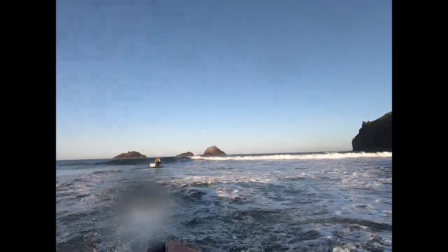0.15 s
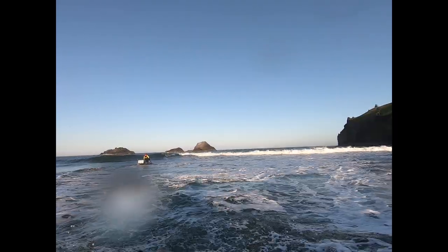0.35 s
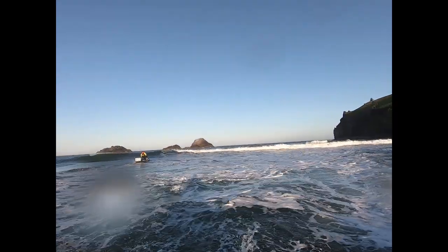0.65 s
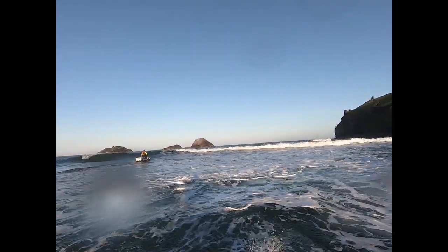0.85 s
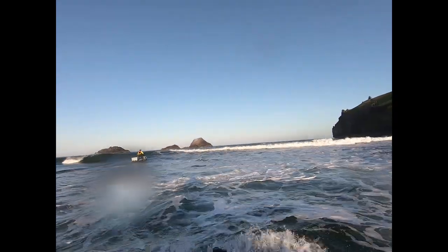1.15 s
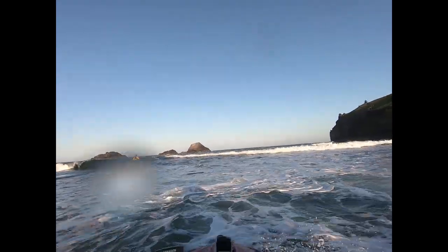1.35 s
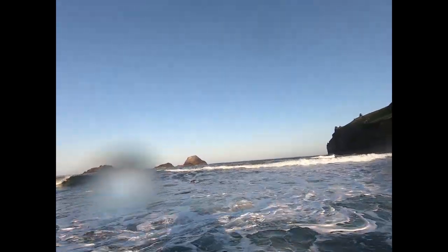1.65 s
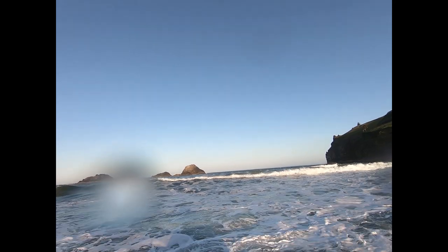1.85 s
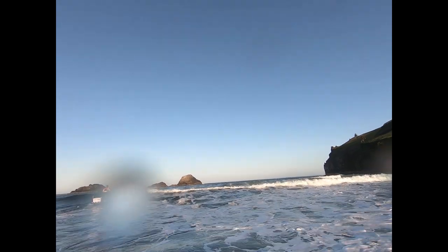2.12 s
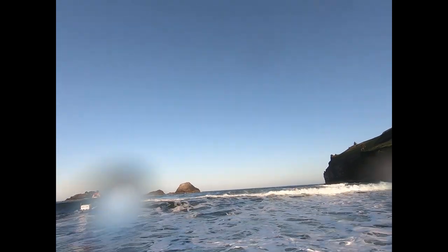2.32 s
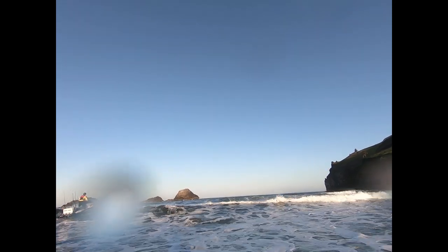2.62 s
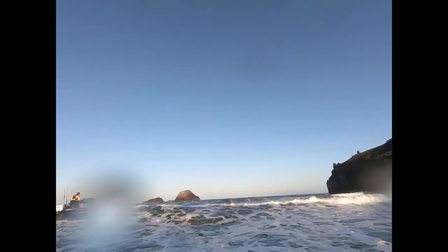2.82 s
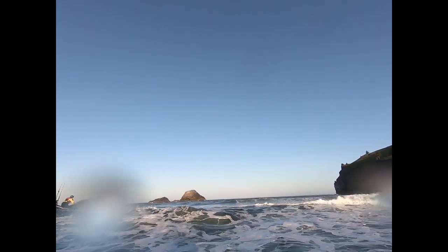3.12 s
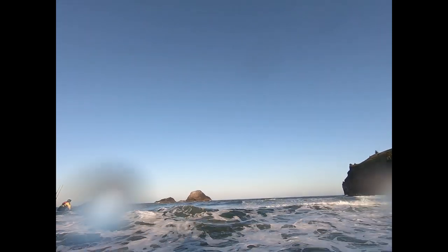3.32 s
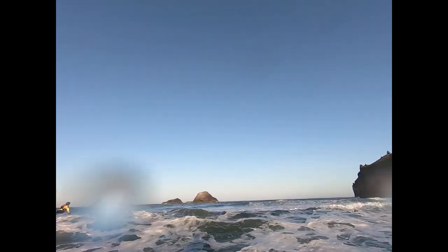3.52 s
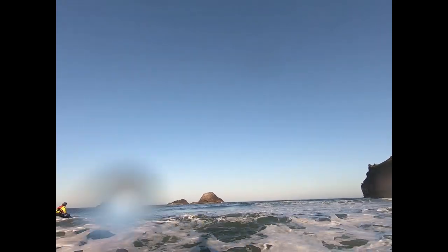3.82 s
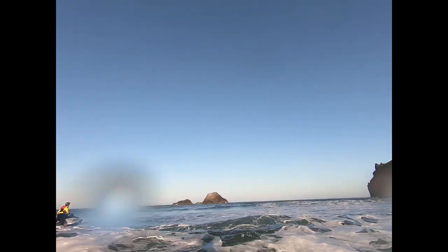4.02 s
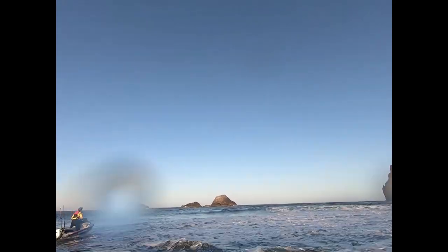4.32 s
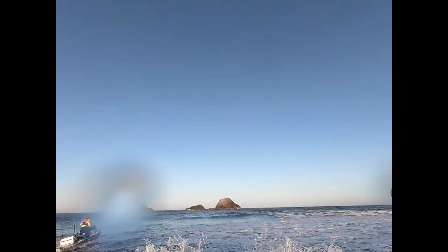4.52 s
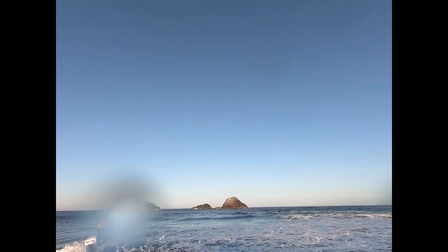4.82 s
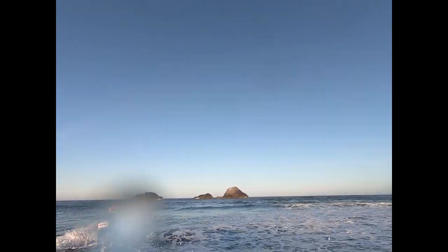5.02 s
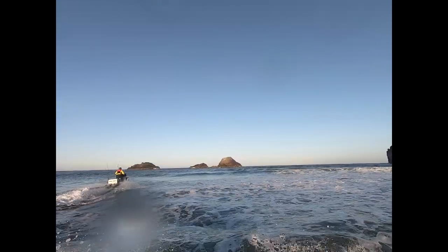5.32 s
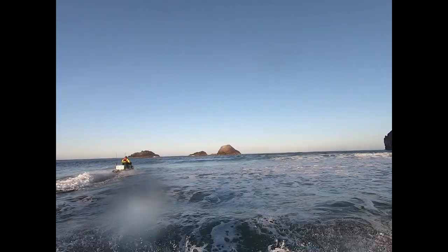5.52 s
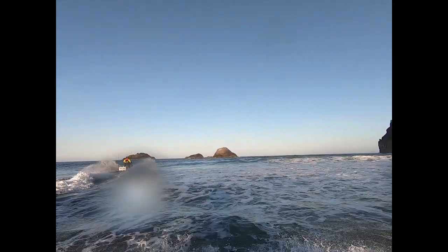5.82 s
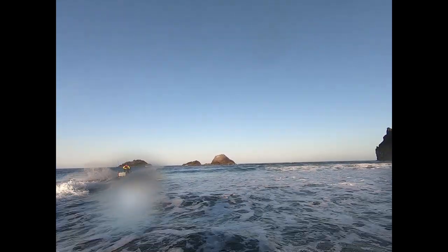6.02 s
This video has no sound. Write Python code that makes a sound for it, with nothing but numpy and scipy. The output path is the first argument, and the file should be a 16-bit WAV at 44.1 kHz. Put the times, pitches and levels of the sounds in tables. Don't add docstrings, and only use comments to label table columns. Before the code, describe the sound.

From a camera mounted on a small jet watercraft in open surf, a buzzing engine hums through the hull, racing over crests and sagging between them. Water rushes, slaps and hisses constantly, chop drums on hollow panels, and low wind buffets the microphone. The wide sound narrows to mono after two seconds; the engine bogs down near the end, then revs hard again.

```python
import sys
import numpy as np
from scipy import signal
from scipy.fft import next_fast_len
from scipy.io import wavfile
from scipy.ndimage import uniform_filter1d, minimum_filter1d

SR = 44100
rng = np.random.default_rng(int(sys.argv[2]) if len(sys.argv) > 2 else 0)


def attenuation_scalar(level_db):
    decades = np.asarray(level_db, float) / 20
    return 10 ** decades


def to_wav(s):
    ch = np.atleast_2d(s).T
    pcm = np.round(np.clip(ch, -1, 1) * 32767)
    wavfile.write(sys.argv[1], SR, pcm.astype(np.int16))


N = 271215
TIME = np.arange(N) / SR
HOP, SIZE = 256, 1024
HZ = np.fft.rfftfreq(SIZE, 1 / SR)
FRAME_S = np.arange(N // HOP + 5) * HOP / SR
MIST_FROM = 4.3

# (frequency [Hz], likeness [0-1])
PORT_LIKENESS = [(60, .6), (170, .95), (400, .75), (690, .25), (1100, .7), (2100, .6), (2600, .35),
                 (3800, .75), (5300, .25), (15000, .2)]
# (frequency [Hz], level difference [dB])
PORT_LEAN = [(60, -2.5), (150, -3.5), (450, -7), (800, -7), (1400, -3), (2800, -.5), (6000, -6.5),
             (7000, -1), (8600, 1), (15000, -1)]
# (frequency [Hz], phase [rad])
PORT_LEAD = [(60, 0), (560, 0), (860, 2), (2070, 1.3), (2600, .8), (3800, .8), (5200, -.2), (8600, -2.3),
             (15000, -2.3)]
# (time [s], stereo share [0-1])
STEREO_SHARE = [(0, 1), (1.95, 1), (2.4, 0.31), (2.8, 0.14), (3.2, 0.017), (3.4, 0.0033), (6.15, .003)]
# (middle [s], length [s], level [dB])
HULL_SURGES = [(0.24, 0.18, 3.5), (0.854, 0.49, 5), (1.34, 0.42, 2), (1.9, 0.19, 7.5), (2.27, 0.58, -4),
               (3, 0.11, 1), (3.27, 0.99, -6), (3.74, 0.89, -5.5), (4.3, 0.29, 0.5), (4.61, 1, 6),
               (5.9, 0.34, 2), (4.9, 0.22, 3.5), (3.1, .2, -1.5), (2.7, 0.65, -2.5), (4.78, 0.15, -0.5),
               (5.48, 0.77, 2.5), (5, 0.21, 1), (6.14, 0.66, 4), (4.07, 0.62, 2.5), (1.3, 0.12, 0.5),
               (4.87, 0.13, -3.5), (4.96, .12, -3), (2.97, .2, -2), (4.1, .1, -1), (4.12, 0.16, -2),
               (2.06, .15, 2), (5.2, .25, 2), (5.65, .15, -1.5)]


def evened(x):
    return x / np.sqrt(np.mean(abs(x) ** 2) + 1e-20)


def read(points, hz):
    f, value = np.transpose(points)
    return np.interp(np.log(hz + 1), np.log(f + 1), value)


def columns(table, t):
    s, *rest = np.transpose(table)
    return [np.interp(t, s, c) for c in rest]


def stereo_share(t):
    return columns(STEREO_SHARE, t)[0]


def swells(table, t):
    return sum(top * np.cos(np.pi * np.clip((t - s) / length, -.5, .5)) ** 2 for s, length, top in table)


def bump(shape, amount):
    hz, width, db = shape
    return np.outer(db * np.exp(-.5 * ((HZ - hz) / width) ** 2), amount)


def drift(hz):
    chance = uniform_filter1d(rng.standard_normal(N), size=200)
    return evened(signal.lfilter([1], [1, -np.exp(-2 * np.pi * hz / SR)], chance))


def add(mix, s, sound):
    part = mix[round(s * SR):][:len(sound)]
    part += sound[:len(part)]


def ports(x, lean_db, lead):
    turn = np.exp(.5j * lead * np.array([[1], [-1]]))
    padded = np.pad(x, SIZE, "reflect", reflect_type="odd")
    whole = signal.hilbert(padded, next_fast_len(N + 2 * SIZE))
    return (whole[SIZE:SIZE + N] * turn).real * attenuation_scalar(np.array([[.5], [-.5]]) * lean_db)


def noise(field_db, same, lead, lean_db, patchy_db, flicker_db):
    a, b, c, d, patches = rng.standard_normal((len(FRAME_S), len(HZ), 5)).T
    flicker = evened(uniform_filter1d(uniform_filter1d(patches, size=120, axis=0), size=2, axis=1))
    patches = evened(uniform_filter1d(uniform_filter1d(patches, size=10, axis=0), size=12, axis=1))
    same, lead = np.clip(same, -1, 1)[:, None], lead[:, None]
    left = a + 1j * b
    right = same * left * np.exp(-1j * lead) + np.sqrt(1 - same ** 2) * (c + 1j * d)
    z = np.array([left, right])
    z *= attenuation_scalar(np.multiply.outer([.5, -.5], lean_db))[:, :, None]
    z /= np.sqrt((1 + same * np.cos(lead)) / 2)
    z *= attenuation_scalar(field_db + patchy_db * patches + flicker_db * flicker)
    return signal.istft(z, nperseg=SIZE, noverlap=SIZE - HOP)[1][:, :N] / np.sqrt(SIZE)


def unit_band(shape_db, lo_hz, hi_hz):
    inside = (HZ > lo_hz) & (HZ < hi_hz)
    return shape_db - 10 * np.log10(np.sum(attenuation_scalar(shape_db[inside]) ** 2, axis=0) / len(HZ))


def speed(t):
    # (time [s], firing rate [Hz])
    throttle = [(0, 109.3), (.71, 110.5), (1.02, 175.6), (1.61, 149.5), (1.8, 148.1), (2.09, 118.9),
                (3.03, 126.1), (3.22, 112.8), (3.42, 87.3), (3.62, 79.36), (3.9, 78.84), (4.12, 97.32),
                (4.42, 98.9), (4.65, 54.8), (4.85, 43.63), (5.04, 109.5), (5.24, 155), (6.15, 136)]
    # (middle [s], length [s], rise [Hz])
    leaps = [(.39, .5, 30), (1.22, 0.52, 20), (2.56, 0.21, 3), (2.62, 0.48, 8), (4.555, .26, 9.5),
             (5.255, 0.31, 22), (.18, 0.15, -4), (.32, .14, 5), (.53, 0.141, 5), (.64, .1, -3),
             (5.8, 0.7, 19.5), (5.69, 0.11, 5.5), (5.77, 0.11, -2.5), (3.96, .12, -3), (4.07, .12, 2),
             (5.26, .14, -5), (4.64, .1, 3), (2.59, .12, 2), (4.75, .1, -3)]
    inertia_s = .04
    before, after = columns(throttle, t - inertia_s / 2)[0], columns(throttle, t + inertia_s / 2)[0]
    return (before + after) / 2 + swells(leaps, t)


def level(rule, t):
    # (time [s], level [dB])
    thrown = [(0, 9.5), (.31, 7.5), (.6, 3), (1.04, 3.5), (1.6, 3), (1.88, 1), (2.02, -7), (2.48, -6.5),
              (3.07, -2), (3.4, -1), (3.94, 5), (4.33, 1.5), (4.64, -7.5), (4.8, -6), (5.05, 4), (5.33, 6),
              (5.53, 0), (6.15, -6.5)]
    # (middle [s], length [s], level [dB])
    bow_waves = [(.6, 0.082, 1.5), (.76, 0.24, 0), (1.2, 0.72, 2.5), (1.72, 0.17, 2.5), (2.24, 0.85, 5.5),
                 (3.42, 0.6, 2.5), (4.75, 0.43, -1.5), (5.8, .6, 3), (6.1, 0.49, 1), (.1, 0.53, -1.5),
                 (1.13, 0.081, 1.5), (4.35, 0.42, 1.5)]
    db, share, octave_db, open_db = rule
    throw = columns(thrown, t)[0] + swells(bow_waves, t)
    return db + share * throw + octave_db * np.log2(speed(t) / 120) + open_db * stereo_share(t)


def wind():
    # (frequency [Hz], density [dB per Hz])
    wind_colour = [(12, -4.5), (25, 8.5), (45, 10), (80, 16), (150, -5.5), (300, -16.5), (600, -79.5),
                   (2000, -130)]
    # (middle [s], length [s], level [dB])
    buffets = [(.68, 0.66, 6.5), (1.05, 1, 17.5), (1.27, 0.13, 8), (1.455, 0.31, 14), (1.73, 0.094, 13.5),
               (1.9, 0.67, 19.5), (2.81, 0.1, 10), (3.1, 0.81, 6.5), (3.82, 0.18, 9), (3.55, .3, -16),
               (4.15, 1, -23.5), (.25, .3, -1), (1.6, 0.17, 12.5), (2.1, 0.21, 5), (3.4, .2, 9.5),
               (4.57, .1, 1.5), (4.72, 0.55, 18.5), (.6, 0.11, 10), (5.35, .1, 8.5), (5.76, .1, 10),
               (3.75, .4, 7.5), (5.3, 0.13, -2), (5.55, 0.31, 16), (5.82, .25, -7), (5.28, .1, 5),
               (4.75, .15, 3), (4.15, .3, -5.5), (.42, .12, -5.5), (1.0, 0.11, 3.5), (.62, .15, 3)]
    calm_db = -40.5
    field = unit_band(read(wind_colour, HZ)[:, None], 10, 100) + calm_db + swells(buffets, FRAME_S) + 5.0
    slap_s, spread_s, slap_db, top_hz = 1.925, .028, -23, 700
    puff = signal.sosfilt(signal.butter(3, top_hz, fs=SR, output="sos"), rng.standard_normal(N))
    slap = attenuation_scalar(slap_db) * evened(puff) * np.exp(-.5 * ((TIME - slap_s) / spread_s) ** 2)
    buffeting = noise(field, .35 + 0 * HZ, 0 * HZ, -2.5 + 0 * HZ, patchy_db=1.2, flicker_db=.8)
    return buffeting + slap * np.array([[1], [-.9]])


def water():
    # (frequency [Hz], density [dB per Hz])
    open_colour = [(350, -17.5), (600, -2.5), (642, -20.5), (798, -12), (1080, -6.5), (1340, -12),
                   (1450, -10), (2500, -17.5), (3110, -18.5), (4680, -29), (6230, -22.5), (8290, -37),
                   (11000, -48), (12600, -49.5), (15500, -69)]
    # (frequency [Hz], density [dB per Hz])
    sheltered_colour = [(350, -16), (600, -13.5), (900, -6), (1290, -10), (1830, -13), (2570, -23),
                        (3500, -21), (5430, -18.5), (6940, -31.5), (9240, -39.5), (11200, -51.5),
                        (11900, -40), (12600, -35), (15600, -45.5)]
    # (middle [s], length [s], frequency [Hz], width [Hz], level [dB])
    cancel = [
        (2.42, .5, 3350, 220, -6.5),
        (2.55, .7, 2900, 300, -3.5),
        (2.85, .6, 2800, 250, -4),
        (2.2, .5, 2800, 400, -2.5),
    ]
    # (middle [s], length [s], level [dB])
    douses = [
        (.15, 0.45, 3),
        (0.78, .1, 0),
        (0.91, .2, -3),
        (1.1, .12, -1.5),
        (4.3, .2, 1.5),
    ]
    # (middle [s], length [s], level [dB])
    hisses = [
        (.62, 0.055, 3),
        (.75, 0.18, 4),
        (1.14, 0.11, 1),
        (.95, 0.24, 0.5),
        (1.75, 0.41, -1),
        (2.76, .05, 2),
        (.4, .12, -2),
        (1.2, .06, 2),
        (5.75, .3, 0),
        (6.05, 0.39, -5.5),
    ]
    # (middle [s], length [s], level [dB])
    flecks = [
        (1.92, .1, 7),
        (2.81, .35, 10.5),
        (3.4, .9, 3),
        (2.55, .5, 9.5),
        (.62, .1, 5),
        (4.1, 0.27, 6.5),
        (4.65, .3, 2.5),
        (4.9, .15, 3),
        (5.2, 0.52, -6.5),
    ]
    share = np.clip(stereo_share(FRAME_S), 0, 1)
    shapes = bump((910, 210, 5.3), np.clip((speed(FRAME_S) - 150) / 22, 0, 1))
    for middle, length, *notch in cancel:
        shapes = shapes + bump(notch, swells([(middle, length, 1)], FRAME_S))
    top_share = np.clip((MIST_FROM - FRAME_S) / .2, 0, 1)
    share = np.where(HZ[:, None] > 9500, top_share, share)
    colour = read(open_colour, HZ)[:, None] * share + read(sheltered_colour, HZ)[:, None] * (1 - share)

    wash = level((-37, 0.6747, 0.5, -1.85), FRAME_S) + 0.35 * swells(HULL_SURGES, FRAME_S)
    splash = level((-49, 0.88, -0.9, 4.5), FRAME_S) + swells(douses, FRAME_S)
    spray = level((-49.5, 1.0, -0.5, 2), FRAME_S) + swells(hisses, FRAME_S)
    mist = level((-95, 1.7, -1.9, 14), FRAME_S) + swells(flecks, FRAME_S)
    mist = mist + 28 * np.clip((FRAME_S - 4.3) / .25 + .5, 0, 1)

    bands = [(700, 2000), (2200, 4000), (4500, 9000), (11800, 15500)]  # Hz, wash to mist
    lift = np.array([db + (unit_band(colour, *band) - colour)[0]
                     for band, db in zip(bands, (wash, splash, spray, mist))])
    corners_hz = [1600, 2600, 3400, 4200, 10500, 11600]
    place = np.interp(np.log(HZ + 1), np.log(corners_hz), [0, 1, 1, 2, 2, 3])
    weight = np.maximum(1 - abs(place[:, None] - np.arange(4)), 0)
    field = colour + weight @ lift + shapes + 2.7 * weight[:, 3:]
    return noise(field, read(PORT_LIKENESS, HZ), read(PORT_LEAD, HZ), read(PORT_LEAN, HZ),
                 patchy_db=0.32, flicker_db=.6)


def drops():
    # (time [s], level [dB], frequency [Hz])
    stray_drops = [
        (2.764, -31, 690),
        (4.812, -26.5, 533),
    ]
    t, out = np.arange(1200) / SR, np.zeros(N)
    for s, db, hz in stray_drops:
        add(out, s, attenuation_scalar(db - 60 * t / 0.028) * np.sin(2 * np.pi * hz * t))
    return out


def hull():
    # (frequency [Hz], density [dB per Hz])
    roar_colour = [(40, -22), (70, 0.5), (120, 3), (250, 2.5), (400, -3.5), (600, -12), (900, -19),
                   (1500, -50.5), (4000, -120)]
    # (middle [s], length [s], level [dB])
    drumming = [
        (.38, .3, 4),
        (1.6, 0.89, 17.5),
        (2.5, 0.86, 3),
        (3.3, .5, 3),
        (4.2, 0.47, -5),
        (4.62, .2, 1),
        (5.5, .3, 8),
    ]
    # (time
    # [s], start [Hz], end [Hz], length [s], level [dB])
    gulps = [(.22, 505, 507, 0.12, -28), (0.331, 103.3, 118.2, 0.14, -12.5),
             (0.441, 166.5, 175.4, 0.12, -21.5), (0.704, 349, 347, 0.12, -25),
             (0.777, 421, 423.4, 0.13, -31), (0.847, 103.5, 114.7, 0.08, -14.5),
             (1.349, 107, 117, 0.06, -23.5), (1.535, 582, 617, 0.097, -32),
             (4.455, 74.4, 125.6, 0.15, -21.5), (4.574, 125.4, 121.5, 0.16, -18),
             (5.235, 133, 135.7, 0.084, -14), (5.41, 441, 416, 0.094, -24.5), (5.46, 207, 201, 0.076, -22),
             (0, 416.5, 423, 0.079, -30.5), (5.424, 413.5, 415.4, 0.31, -29),
             (5.677, 493.8, 509.7, 0.23, -58), (5.954, 436, 437, 0.082, -29)]
    roar = unit_band(read(roar_colour, HZ)[:, None], 400, 700) + level((-35.5, 0.47, 2.5, -2), FRAME_S)
    roar = roar + swells(HULL_SURGES, FRAME_S) + 2.5
    sheltered = 1 - stereo_share(FRAME_S)
    roar = roar + bump((45, 30, -6), sheltered)
    roar = roar + bump((410, 60, -3), sheltered)

    boom_hz, width_hz = 113, 30
    band = signal.butter(2, [boom_hz - width_hz / 2, boom_hz + width_hz / 2], "band", fs=SR, output="sos")
    boom_db = level((-46.5, 1.5, -1.5, 4.5), TIME) + swells(drumming, TIME)
    boom = evened(signal.sosfilt(band, rng.standard_normal(N))) * attenuation_scalar(boom_db)
    for s, start_hz, end_hz, length, db in gulps:
        hz = np.linspace(start_hz, end_hz, round(length * SR))
        gulp = np.hanning(len(hz)) * np.sin(2 * np.pi * np.cumsum(hz) / SR)
        add(boom, s, attenuation_scalar(db) * np.sqrt(2) * gulp)

    wash = noise(roar, read(PORT_LIKENESS, HZ), read(PORT_LEAD, HZ), read(PORT_LEAN, HZ),
                 patchy_db=.8, flicker_db=-.3)
    throb = 1 + .2 * np.cos(2 * np.pi * np.cumsum(speed(TIME)) / SR)
    return wash * throb + ports(boom, lean_db=-4.0, lead=0.18)


def rings():
    # (middle [s], length [s], order [thirds of firing rate], level [dB])
    ringing = [(5.6, .2, 8, -34.5), (5.77, .12, 8, -32), (5.3, .15, 10, -34), (2.25, .25, 4, -30),
               (2.3, .5, 7, -34), (2.55, 0.23, 7, -32.5), (2.78, .6, 7, -34.5), (2.75, .2, 8, -36),
               (2.95, 0.29, 8, -35), (3.6, 0.18, 18, -37.5), (3.97, .15, 18, -36), (3.78, .2, 16, -39),
               (3.85, .3, 12, -35), (3.8, .3, 10, -38), (4.2, .3, 10, -33), (4.25, .2, 8, -29),
               (4.72, .12, 14, -33), (5.08, .15, 12, -35.5), (5.16, .1, 12, -37), (5.27, 0.14, 12, -35),
               (5.05, .2, 7, -29.5), (4.93, .1, 11, -30.5)]
    out = np.zeros(N)
    cycle = 2 * np.pi * np.cumsum(speed(TIME)) / SR / 3
    for s, length, thirds, db in ringing:
        part = cycle[round((s - length / 2) * SR):][:round(length * SR)]
        tone = np.hanning(len(part)) * np.sin(round(thirds) * part)
        add(out, s - length / 2, attenuation_scalar(db) * np.sqrt(2) * tone)
    return ports(out, lean_db=-4.5, lead=.15)


def order_levels(hz, t):
    # (time [s], level [dB])
    engine_load = [(0, -5.5), (.3, -6), (.6, -7.5), (.75, -2.5), (1.1, -1), (1.22, -6.5), (1.35, 2.5),
                   (2, -6), (2.4, -4), (2.8, -5.5), (3.05, -3), (3.3, -12.5), (3.6, -11.5), (4.1, 0.5),
                   (4.5, -4.5), (4.8, 0), (5.05, -3), (6.15, 3)]
    # (frequency [Hz], level [dB])
    carry = [(45, -19.5), (80, -12), (110, -3), (160, -1.5), (200, -3), (250, 1.5), (300, -13.5),
             (500, -16.5)]
    # (middle [s], length [s], level [dB])
    rocks = [(0, .12, 16), (.3, 0.49, 18), (.5, 0.4, 20.5), (.85, .3, 9.5), (1.42, 0.28, 9.5),
             (1.79, 0.37, 9.5), (2.4, 1.4, 11), (2.8, 0.43, 7), (4.75, .3, 6), (5.43, 0.2, 15.5),
             (5.97, 0.15, 8.5)]
    # (middle [s], length [s], firing [dB], second [dB], third [dB])
    dunks = [(0.076, 0.15, 9, 2.5, -12.5), (0.176, 0.056, 2, 3, 13.5), (0.426, 0.24, -4, 5, 12.5),
             (0.514, 0.062, -6, -1, -7), (0.63, 0.087, -9, 3.5, -4.5), (0.759, 0.2, 3.5, -17, 8),
             (1.019, 0.19, 2.5, 11.5, 10), (1.394, 0.15, -2.5, -6.5, -1), (1.549, 0.39, 0.5, 4, 6),
             (2.604, 0.51, -5, 2.5, -2), (2.874, 0.13, -19, 1.5, -4.5), (3.32, 0.41, -8, 1, 2.5),
             (3.606, 0.61, 3.5, 3, 5.5), (4.451, 0.24, -14.5, -1, 11), (4.514, 0.22, -18, 3.5, 6.5),
             (4.603, .08, 2, -11, -0.5), (1.37, 0.089, -1, -9, 3.5), (0.193, .1, -0.5, 0, 2.5),
             (4.189, 0.31, -6, 1.5, 2), (.26, .1, 4.5, -2.5, 6), (1.749, 0.4, 1, 0, 8.5),
             (2.58, 0.32, 6.5, -1, 7), (1.234, 0.34, -0.5, 8.5, 5), (5.16, 0.14, 1.5, -22, 3),
             (0.56, 0.074, 0, -7, -8.5), (3.384, .1, 2, 0, 8.5), (1.969, 0.28, 3.5, 0, 1.5),
             (4.634, 0.27, 9, -12, -2), (4.869, 0.14, -20, 4.5, -3), (5.006, 0.31, 7.5, -4, 2),
             (5.092, 0.09, 1.5, 3, -2.5), (5.225, 0.15, 0, -14, 2.5), (5.413, 0.34, 1.5, -16.5, 7.5),
             (5.606, 0.12, 1.5, 3.5, -5), (5.799, 0.61, 0, -7.5, 4), (6.097, 0.37, -8, -3.5, 0),
             (4.03, .22, 0, 4, 6), (4.73, .18, 7, 5, -3), (4.93, .08, -8, 0, 0), (2.85, .5, 0, 1, 3)]
    load = columns(engine_load, t)[0]
    firing, second, third = (swells([(row[0], row[1], row[i]) for row in dunks], t) for i in (2, 3, 4))
    return (-14 + load + read(carry, hz) + firing,
            -15 + load + read(carry, 2 * hz) + second,
            -28 + load + .5 * read(carry, 2 * hz / 3) + swells(rocks, t),
            -25 + load + read(carry, 3 * hz) + third)


def engine():
    # (order [thirds of firing rate], level [dB])
    minor_orders = [(4, -15), (5, -23), (7, -14), (8, -12.5), (10, -16.5), (12, -1.5), (18, -9)]
    # (middle [s], length [s], level [dB])
    growls = [(1.1, 0.67, 12), (2.3, 0.59, 2), (2.9, .5, -4), (3.42, 0.31, -12), (3.75, 0.43, -1.5),
              (3.6, 0.13, 1.5), (3.97, .1, 6), (4.15, 0.37, -5.5), (4.5, .25, -14), (5.25, .3, -5),
              (5.5, .3, -3)]
    hz = speed(TIME)
    firing_db, second_db, crank_db, third_db = order_levels(hz, TIME)
    cycle = 2 * np.pi * np.cumsum(hz * (1 + .003 * drift(12))) / SR / 3

    def order(thirds, db, shake):
        phase = thirds * cycle + shake * drift(8) + 2 * np.pi * rng.random()
        return attenuation_scalar(db + .7 * drift(15)) * np.sin(phase)

    low = order(3, firing_db, .1) + order(2, crank_db, .3)
    high = order(6, second_db, .12) + order(9, third_db, .3)
    glide = uniform_filter1d(abs(np.gradient(np.log(hz))) * SR, size=4000)
    weak_db = np.minimum(third_db, -30) - 8 * glide - .08 * (hz - 80) + swells(growls, TIME)
    for thirds, db in minor_orders:
        tone = np.sin(round(thirds) * cycle + 0.29 * drift(9.0))
        high = high + attenuation_scalar(weak_db + db + 2.0 * drift(7.7)) * tone
    return np.sqrt(2) * (ports(low, lean_db=-3.8, lead=.15) + ports(high, lean_db=-4.5, lead=.15))


def thin_treble(x):
    # (frequency [Hz], share of lines dropped [0-1])
    dropped_share = [(7000, 0.0), (8500, .15), (10000, .45), (12000, .55), (14000, .7), (15700, .75)]
    # (time [s], edge [Hz])
    top_edge = [(0, 14600), (1.9, 14000), (2.05, 12800), (2.65, 12500), (2.72, 14400), (2.9, 14400),
                (3, 11600), (3.3, 12400), (3.75, 13600), (4.1, 15200), (4.25, 17000), (6.15, 17000)]
    padded = np.pad(x, [(0, 0), (0, 2048)], "reflect", reflect_type="odd")
    z = signal.stft(padded, boundary="odd", nperseg=2048, noverlap=1536)[2]
    hz, t = np.fft.rfftfreq(2048, 1 / SR), np.arange(z.shape[2]) * 512 / SR
    tiles = np.kron(rng.random((z.shape[2] // 3 + 1, 147)).T, np.ones((7, 3)))[:len(hz), :len(t)]
    odds = np.outer(read(dropped_share, hz), np.clip(.12 + .88 * stereo_share(t), 0, 1))
    gap = np.exp(-((hz - 11050) / 450) ** 2)
    odds = odds + .5 * np.outer(gap, .8 + .9 * (t > 5.22)) * (t > MIST_FROM)
    wobble_hz = np.repeat(rng.normal(0, 550, len(t) // 4 + 1), 4)[:len(t)]
    edge_hz = columns(top_edge, t)[0] + wobble_hz * (.3 + stereo_share(t))
    kept = np.where(tiles < odds, attenuation_scalar(-30), 1) / np.sqrt(1 - odds)
    kept = kept * np.where(hz[:, None] > edge_hz, attenuation_scalar(-40), 1)
    return signal.istft(z * kept, nperseg=2048, noverlap=1536)[1][:, :N]


def scene():
    return wind() + water() + drops() + hull() + rings() + engine()


def band_limit(x):
    return signal.sosfilt(signal.butter(12, 15740, fs=SR, output="sos"), x)


def record(dry):
    mid, side = (dry[0] + dry[1]) / 2, (dry[0] - dry[1]) / 2
    mist = signal.sosfilt(signal.ellip(8, .5, 70, 11700, "high", fs=SR, output="sos"), side)
    mist = mist * np.clip((TIME - 3.5) / .7, 0, 1)
    share = stereo_share(TIME)
    side = share * side + (1 - share) * .7 * mist
    pair = thin_treble(np.array([mid + side, mid - side]))
    swing = uniform_filter1d(-minimum_filter1d(-abs(pair).max(0), size=600), size=600)
    pair = pair * np.minimum((N - np.arange(N)) / 500, 1)
    limited = pair / np.maximum(swing / 0.55, 1) ** 0.78
    return band_limit(limited)


dry = scene()
out = record(dry)
to_wav(out)
```